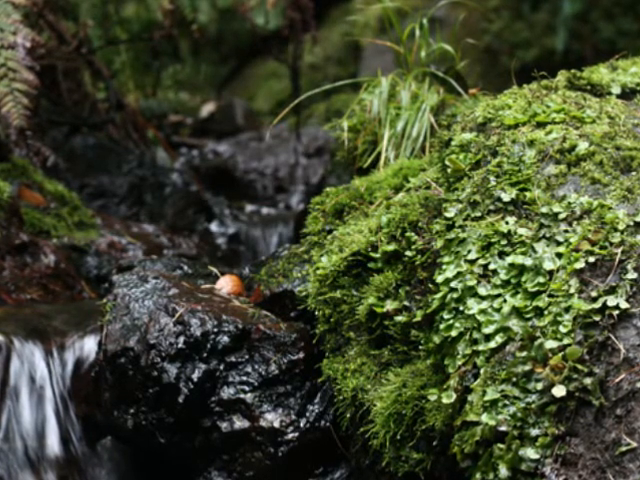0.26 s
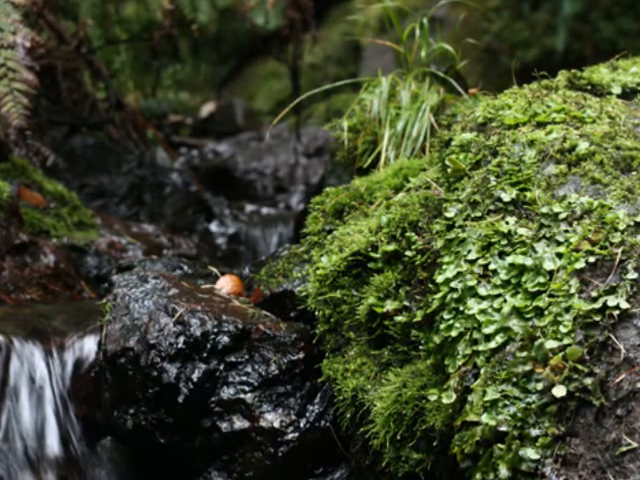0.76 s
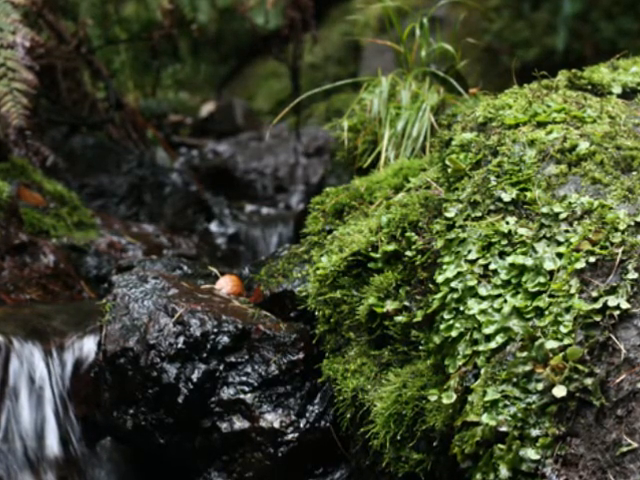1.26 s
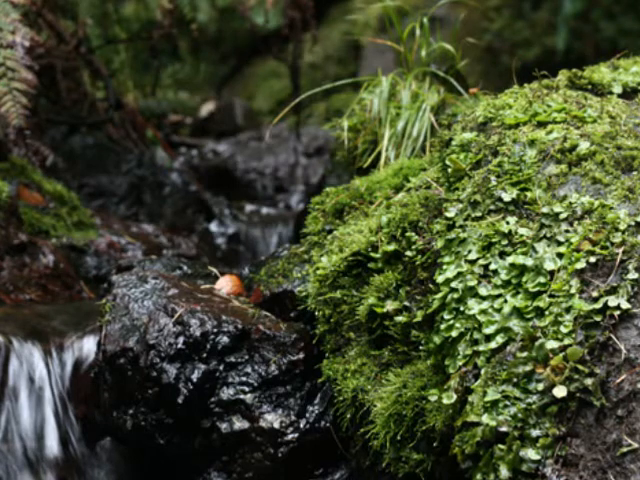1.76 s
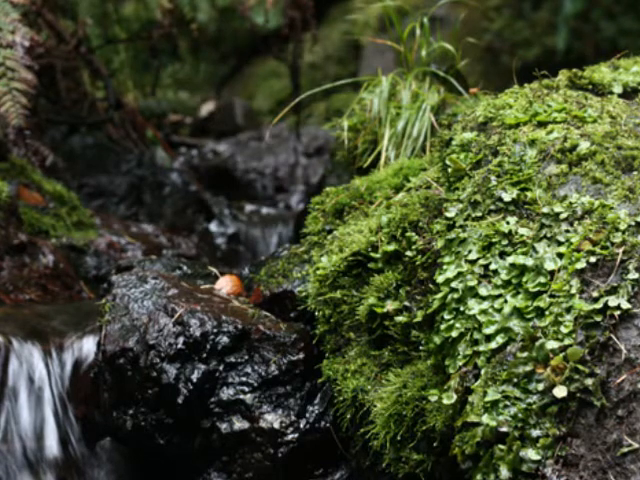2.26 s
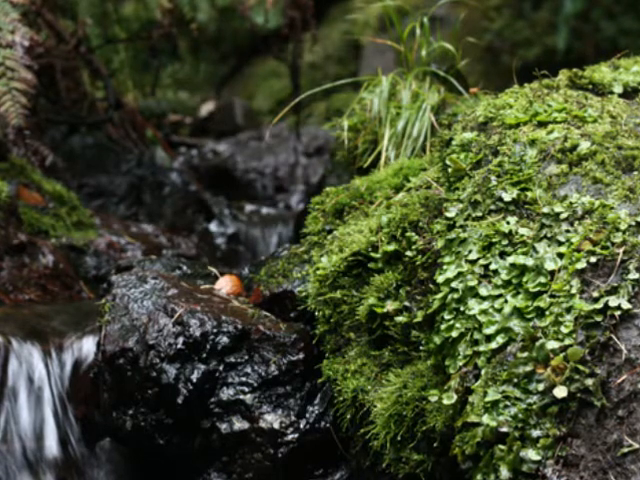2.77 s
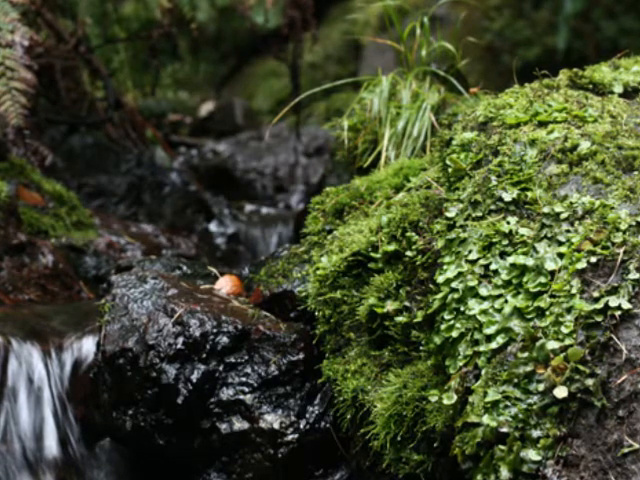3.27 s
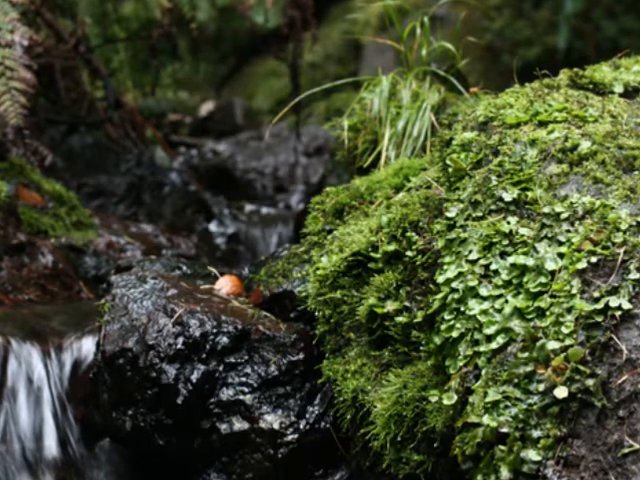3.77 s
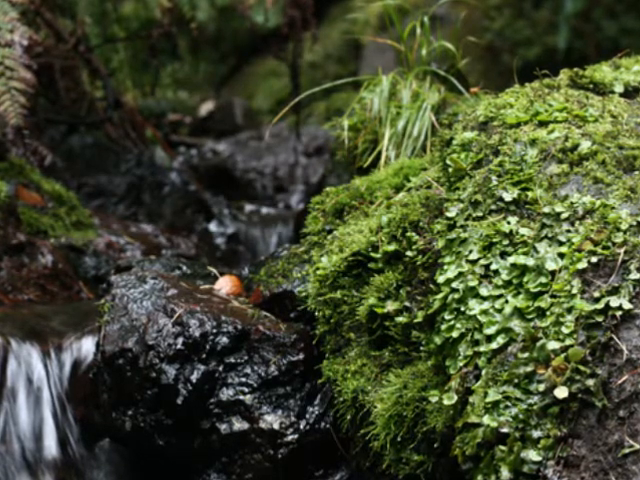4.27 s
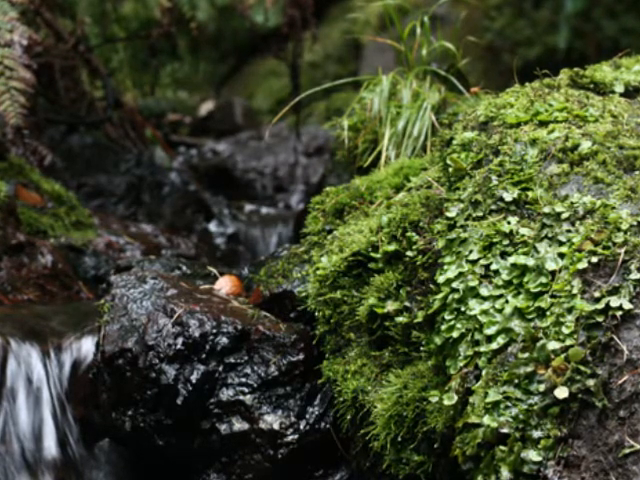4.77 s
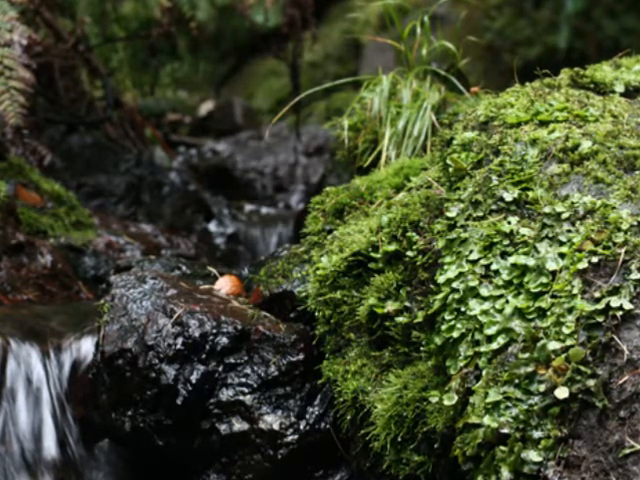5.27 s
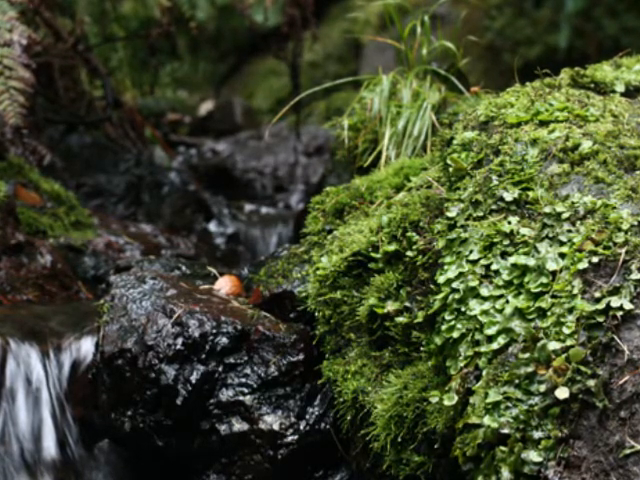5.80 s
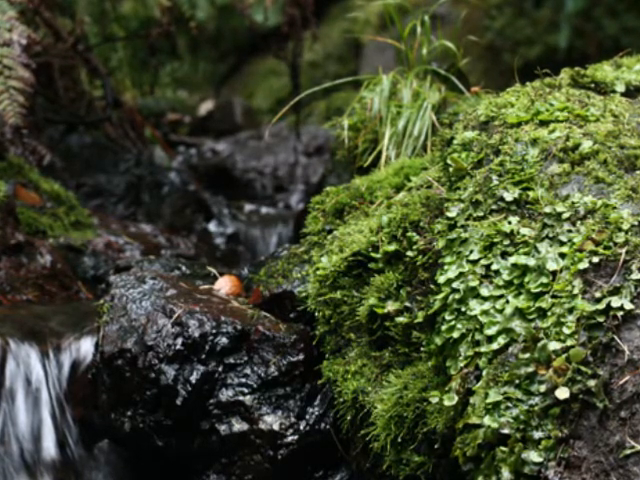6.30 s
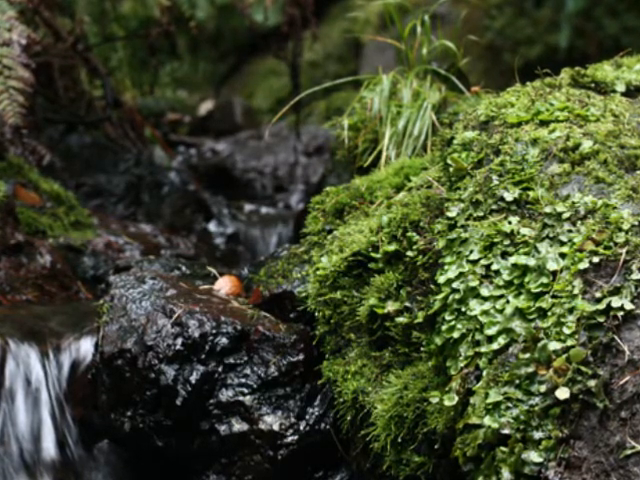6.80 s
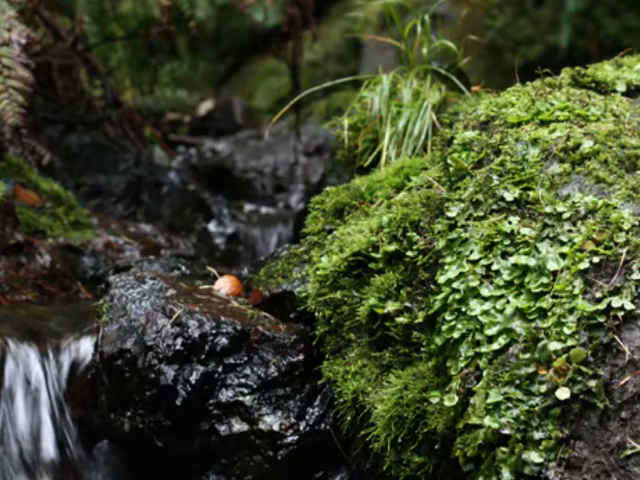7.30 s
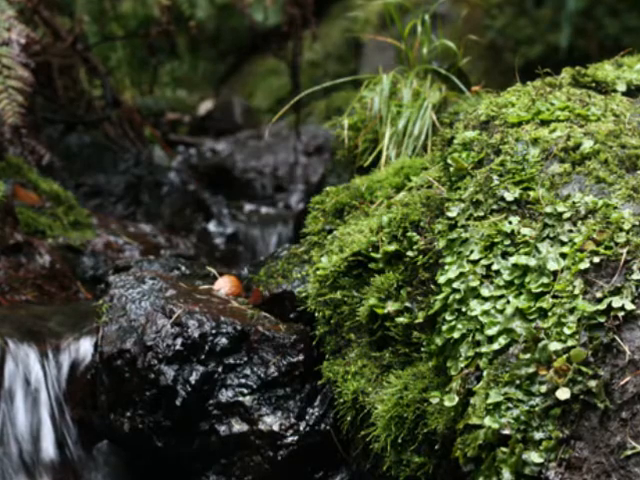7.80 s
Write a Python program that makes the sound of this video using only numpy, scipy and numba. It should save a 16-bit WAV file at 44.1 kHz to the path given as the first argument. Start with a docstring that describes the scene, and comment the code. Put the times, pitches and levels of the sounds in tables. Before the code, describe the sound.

A small stream splashes and bubbles over rocks, then fades within two seconds to a faint trickle with tiny drips.

```python
"""A small woodland stream. A near cascade on the left churns loudly and fades out in about two seconds,
leaving a slowly fading trickle of single bubbles and tiny splashes over a soft rush and a low rumble.
Bubbles ring as short sines that climb in pitch as they near the surface; drops strike as noise bursts.
Wet rocks close by give the single bubbles, the splashes and the near trickle a short tail."""
import sys
import numpy as np
from scipy import signal
from scipy.fft import rfft, irfft, next_fast_len
from scipy.io import wavfile
from scipy.ndimage import uniform_filter1d
from numba import njit

SR = 44100
rng = np.random.default_rng(int(sys.argv[2]) if len(sys.argv) > 2 else 0)


def wrap_up_sound(samples):
    """Save the sound to the file named by the first command line argument, as 16-bit audio."""
    columns = np.atleast_2d(samples).T
    # keep every value between -1 and 1, then stretch to whole-number steps
    tamed = np.clip(columns, -1, 1)
    steps = np.round(tamed * 32767).astype(np.int16)
    wavfile.write(sys.argv[1], SR, steps)


N = 355005

# Cascade bubbles and white water: freq_hz, density_db
CHURN_SPECTRUM = [(120, -90.5), (200, -31), (471, -2.5), (1170, -4.5), (1740, -3.5), (2850, -9.5),
                  (4500, -10), (9830, -22.5), (15500, -28)]
# Spray of tiny drops: freq_hz, density_db
SPRAY_SPECTRUM = [(1000, -16), (2500, -0.5), (6000, -5.5), (10000, -5.5), (15000, -22.5)]
# Cascade balance: freq_hz, left_minus_right_db
CASCADE_PAN = [(200, 2.5), (400, 9.5), (1300, 5.5), (4400, 2.5)]
# Trickle bubbles: freq_hz, density_db
PATTER_SPECTRUM = [(500, -6), (1000, 0), (1600, 1), (3500, -4.5), (7000, -16)]
# Far water: freq_hz, density_db
RUSH_SPECTRUM = [(70, -36.5), (120, -3), (470, -2.5), (700, -1.5), (1800, -9), (5000, -16.5), (9000, -24),
                 (15000, -27.5)]
# Low rumble: freq_hz, density_db
RUMBLE_SPECTRUM = [(12, -69), (20, -13), (53, 4.5), (200, -14), (260, -50), (440, -120)]
# Trickle balance: freq_hz, left_minus_right_db
TRICKLE_PAN = [(60, 3), (380, 0), (1300, 4), (4000, 2)]
# Decay among wet rocks: freq_hz, t60_s
ROCK_DECAY = [(500, 0.041), (8000, 0.056)]
# Single bubbles: start_s, level_db, pitch_hz
CLEAR_BUBBLES = [(0.045, -5, 1960), (0.049, -20.5, 597), (0.103, -3, 2150), (0.154, -1.5, 1710),
                 (0.19, -8.5, 1520), (0.293, -10.5, 1440), (0.335, -7.5, 1474), (0.34, -17, 756),
                 (0.499, -10, 2320), (0.64, -8, 2090), (0.659, -20, 587), (0.72, -3.5, 2270),
                 (0.739, -26.5, 430), (0.77, -11, 1440), (0.817, -16, 770), (0.83, -13, 783),
                 (1.038, -9.5, 2010), (1.231, -19, 812), (1.268, -18, 547), (1.59, -13, 2120),
                 (1.829, -24, 800), (2.173, -34.5, 1394), (2.423, -32, 2836), (2.589, -37.5, 2610),
                 (2.667, -28, 1750), (2.987, -33, 1250), (3.297, -42.5, 1054), (3.465, -36, 2160),
                 (3.519, -28.5, 4060), (3.614, -30.5, 3650), (3.671, -36.5, 1510), (3.723, -31, 1520),
                 (3.927, -35, 3240), (3.985, -37, 1810), (4.085, -38, 1820), (4.159, -34, 2440),
                 (4.23, -40, 1520), (4.282, -31.5, 3850), (4.319, -33.5, 1830), (4.407, -41, 1810),
                 (4.457, -35, 1770), (4.512, -37, 3140), (4.689, -29.5, 1540), (4.741, -35.5, 2130),
                 (4.894, -41.5, 1500), (5.017, -33.5, 3880), (5.04, -41, 1540), (5.114, -39.5, 990),
                 (5.145, -32, 1240), (5.159, -37, 2700), (5.205, -41.5, 1600), (5.387, -38.5, 3170),
                 (5.537, -45, 1080), (5.563, -42, 2010), (5.686, -37.5, 3870), (5.931, -38.5, 1077),
                 (6.103, -40, 2120), (6.135, -34.5, 1217), (6.168, -43.5, 1380), (6.437, -41, 2050),
                 (6.52, -47, 2110), (6.686, -51, 620), (6.704, -41, 1890), (6.75, -57, 620),
                 (6.791, -41.5, 1550), (7.043, -42, 2360), (7.19, -46, 2034), (7.299, -40, 1460),
                 (7.301, -38, 6100), (7.371, -39, 1530), (7.394, -40, 2880), (7.402, -44, 4300),
                 (7.576, -44, 2370), (7.575, -43, 1390), (7.625, -45, 1490), (7.725, -40.5, 5330),
                 (7.965, -36.5, 5700)]
# Single bubble and glug balance: pitch_hz, left_minus_right_db
BUBBLE_PAN = [(500, 28.5), (1200, 9), (1800, 6.5), (4000, 3.5)]
# Drop impacts: start_s, level_db, centre_hz
DROP_SPLASHES = [(0.0543, -16.5, 10370), (0.0685, -9.5, 3320), (0.105, -3, 4460), (0.1332, -13, 7600),
                 (0.2528, -13.5, 5170), (0.357, -9, 4330), (0.398, -13.5, 4260), (0.46, -12, 5900),
                 (0.501, -11.5, 4500), (0.648, -10.5, 4130), (0.7355, -9, 4760), (0.8938, -14, 4320),
                 (1.279, -17, 5870), (1.325, -12.5, 4100), (1.3735, -22, 9300), (1.4708, -23.5, 4340),
                 (1.587, -24, 5070), (1.6256, -21.5, 4960), (1.727, -27, 12100), (1.74, -21.5, 3000),
                 (1.851, -23.5, 3250), (2.146, -30, 4660), (2.2184, -40, 9050), (2.236, -36.5, 5000),
                 (2.5865, -43.5, 9200), (2.783, -35, 3880), (2.9958, -30.5, 4380), (3.086, -39.5, 10700),
                 (3.315, -36, 2880), (3.5813, -34.5, 7300), (3.592, -35, 7000), (3.9265, -47, 10500),
                 (3.9858, -48, 10000), (4.086, -39.5, 9100), (4.479, -40, 4860), (4.5151, -45, 8590),
                 (4.815, -40, 7600), (4.9786, -48, 8900), (5.724, -43.5, 9110), (5.7962, -47, 13600),
                 (6.4228, -47.5, 12300), (6.6023, -45.5, 4350), (6.747, -42, 3540), (6.7983, -42.5, 5380),
                 (6.9172, -49.5, 9100), (7.006, -47, 3420), (7.294, -42.5, 5110), (7.392, -42, 3500),
                 (7.426, -45, 4230), (7.7062, -42, 5250)]
# Rising bubbles: start_s, level_db, start_hz, life_s, rise_share
GLUGS = [(0.098, -27, 405.5, 0.041, 0.65), (0.131, -25, 447, 0.032, 0.54), (0.59, -32, 429.7, 0.073, 0.65),
         (0.66, -40.5, 277.5, 0.08, 0.6), (0.762, -29, 388, 0.05, 0.1), (0.995, -33, 379, 0.055, 0.49),
         (1.048, -30, 419, 0.04, 1.2), (2.489, -39.5, 890, 0.034, 1.2)]

CASCADE_END_S, TRICKLE_END_S = 2.124, 10.27  # fades reach zero
SIDES = np.array([[.5], [-.5]])  # share of pan_db: left, right


def amp(db):
    """dB to gain."""
    return 10 ** (np.asarray(db) / 20)


def unit(x):
    """x at rms 1."""
    return x / np.sqrt(np.mean(x ** 2) + 1e-20)


def along(table, hz):
    """Table value at hz, on a log axis."""
    freq_hz, values = np.transpose(table)
    return np.interp(np.log(hz + 1), np.log(freq_hz + 1), values)


def filtered(x, response):
    """x through the gain curve response(hz)."""
    size = next_fast_len(N + 8192)
    return irfft(rfft(x, size) * response(np.fft.rfftfreq(size, 1 / SR)), size)[..., :N]


def panned(x, pan):
    """Stereo x tilted left per frequency."""
    return filtered(x, lambda hz: amp(along(pan, hz) * SIDES))


def fade(end_s):
    """Linear gain, 1 to 0."""
    return np.clip(1 - np.arange(N) / SR / end_s, 0, 1)


def drop_times(count):
    """Falling drops: uneven, never long apart."""
    return (np.arange(count) + 5 * rng.random(size=count)) * N / SR / (count + 5)


def flurry_times(drops_s, count, lag_s):
    """Bubbles follow the drops in flurries."""
    pick, wait = rng.random((count, 2)).T
    parent_s = drops_s[(pick ** 1.15 * len(drops_s)).astype(int)]
    return (parent_s - lag_s * np.log(1 - wait)) % (N / SR)


@njit
def ring(out, start, hz, cycles, gains, rise, attack_s, sag):
    """Adds sines that swell, sag and die; pitch climbs as each bubble nears the surface."""
    for k in range(len(start)):
        for i in range(min(int(cycles[k] * SR / hz[k]), out.shape[1] - start[k])):
            turns = i * hz[k] / SR
            age = turns / cycles[k]
            onset = 1 - np.exp(-(i / SR / (attack_s + 1 / hz[k])) ** 2)
            decay = np.exp(-sag * age - 8 * age ** 3)
            tone = np.sin(2 * np.pi * turns * (1 + rise[k] * age / 2)) * onset * decay
            out[0, start[k] + i] += gains[0, k] * tone
            out[1, start[k] + i] += gains[1, k] * tone


def bubbles(start_s, level_db, hz, cycles, pan_db, rise, attack_s, sag):
    """Ringing bubbles placed in stereo."""
    out = np.zeros((2, N))
    gains = amp(level_db + pan_db * SIDES)
    ring(out, (start_s * SR).astype(int), hz, np.clip(cycles, 1, 120), gains, rise, attack_s, sag)
    return out


def swarm(start_s, spectrum, cycles, spread_db, rise, width_db):
    """Random bubbles of all sizes; a few stand well above the rest."""
    pitch, rank, life, side, climb = rng.random((len(start_s), 5)).T
    low_hz, high_hz = spectrum[0][0], spectrum[-1][0]
    hz = low_hz * (high_hz / low_hz) ** pitch
    tilt_db = 18 * np.log10(hz / low_hz)  # offsets small bubbles being rarer per Hz and shorter
    level_db = along(spectrum, hz) + tilt_db - spread_db * np.log(rank + 0.087)
    life_cycles = cycles * np.exp(1.89 * (life - .5))
    pan_db = width_db * (2 * side - 1)
    rises = rise * climb ** 2 * np.sqrt(1000 / hz)
    return unit(bubbles(start_s, level_db, hz, life_cycles, pan_db, rises, attack_s=0.00022, sag=3.0))


def rush(spectrum, correlation, patch_db, patch_bands=6):
    """Rushing water: stereo noise with patches of random gain, rms 1."""
    cells = signal.stft(rng.standard_normal((2, N)), nperseg=256)[2]
    patches = uniform_filter1d(rng.standard_normal(cells.shape[1:]), size=patch_bands, axis=0)
    patches = uniform_filter1d(patches, size=6, axis=1)
    mid, side = signal.istft(cells * amp(patch_db * unit(patches)), nperseg=256)[1][:, :N]
    angle = np.arccos(np.clip(correlation, -1, 1)) / 2
    pair = np.cos(angle) * mid + np.sin(angle) * side * np.array([[1], [-1]])
    return unit(filtered(pair, lambda hz: amp(along(spectrum, hz))))


def spray(drops_s, attack_s, spread_db):
    """One soft burst of bright hiss per tiny drop."""
    kicks = np.zeros(N)
    kicks[(drops_s * SR).astype(int)] = amp(-spread_db * np.log(np.linspace(0, 1, len(drops_s)) + 0.05))
    age = np.arange(SR // 8) / SR / attack_s
    bursts = signal.fftconvolve(kicks, age ** 2 * np.exp(-age))[:N]
    return unit(bursts * rush(SPRAY_SPECTRUM, correlation=0.11, patch_db=4.5, patch_bands=20))


def roughen(x, depth, corner_hz):
    """Broken surface: fast random level changes smear tones into splash, treble only."""
    shake = unit(filtered(rng.standard_normal(N), lambda hz: 1 / (1 + (hz / corner_hz) ** 2)))
    return x + depth * filtered(x * shake, lambda hz: 1 / (1 + (corner_hz / (hz + 1)) ** 4))


def cascade():
    """Dense bubble flurries over white water, spattering where it lands."""
    drops_s = rng.permutation(drop_times(count=500))
    starts_s = flurry_times(drops_s, count=9000, lag_s=.018)
    churn = swarm(starts_s, CHURN_SPECTRUM, cycles=19.8, spread_db=3.0, rise=0.49, width_db=24.0)
    white_water = rush(CHURN_SPECTRUM, correlation=0.49, patch_db=3.0)
    spatter = spray(drops_s, attack_s=0.0017, spread_db=6.0)
    water = roughen(churn, depth=0.49, corner_hz=1310) + amp(1.0) * white_water + amp(-11.5) * spatter
    prefade_db = -20.5 - 2.5 * np.exp(-np.arange(N) / SR / 0.7)
    return amp(prefade_db) * fade(CASCADE_END_S) * panned(water, CASCADE_PAN)


def trickle():
    """Tiny drops throw spray and small bubbles over even far water and a low rumble."""
    t = np.arange(N) / SR
    drops_s = rng.permutation(drop_times(count=420))
    starts_s = flurry_times(drops_s, count=3600, lag_s=.014)
    patter = swarm(starts_s, PATTER_SPECTRUM, cycles=27.6, spread_db=3.5, rise=0.35, width_db=6)
    near = roughen(patter, depth=0.39, corner_hz=1200)
    near += amp(-8.0) * spray(drops_s, attack_s=.0025, spread_db=6)
    far = rush(RUSH_SPECTRUM, correlation=0.36, patch_db=1.3)
    rumble = rush(RUMBLE_SPECTRUM, correlation=0.62, patch_db=-0.5)
    water = amp(-52 + 0.21 * t) * (near + amp(-6.0) * rocks(near))
    water += amp(-43.5 - 1.1069 * t) * far
    water += amp(-57.5 + 0.1 * t) * rumble
    return fade(TRICKLE_END_S) * panned(water, TRICKLE_PAN)


def rocks(x):
    """Short scattered reflections off wet stones, separate per ear."""
    hz, t, cells = signal.stft(rng.standard_normal((2, SR // 4)), SR, nperseg=128)
    tail = signal.istft(cells * amp(-60 * t / along(ROCK_DECAY, hz)[:, None]), SR, nperseg=128)[1]
    delayed = np.pad(x, ((0, 0), (130, 0)))
    return signal.fftconvolve(delayed, tail / np.linalg.norm(tail[0]), axes=1)[:, :N]


def clear_bubbles():
    """Single bubbles, each trailed by three weaker, smaller ones; the larger form further left."""
    start_s, level_db, hz = np.transpose(CLEAR_BUBBLES)
    lag, loss, pitch = rng.random((len(start_s), 3, 3)).transpose(2, 0, 1)
    start_s = np.append(start_s, start_s[:, None] + 0.03 * lag ** 2)
    level_db = np.append(level_db, level_db[:, None] - 9.5 - 10 * loss)
    hz = np.append(hz, hz[:, None] * 2.2 ** pitch)
    calm_stretch = np.where(start_s > CASCADE_END_S, 1.73, 1)  # longer ring once the churn is gone
    cycles = 21 * (hz / 1000) ** 0.077 * calm_stretch
    rise = 0.15 * (hz / 1000) ** -1.3  # large bubbles climb further
    pan_db = along(BUBBLE_PAN, hz)
    return bubbles(start_s - .5 / hz, level_db, hz, cycles, pan_db, rise, attack_s=0.00083, sag=3.4)


def splashes(attack_s=0.001, t60_s=0.018):
    """Drops strike the surface: short bursts of bright band noise."""
    out, t = np.zeros((2, N + 4096)), np.arange(4096) / SR
    hz = np.fft.rfftfreq(len(t), 1 / SR)
    for start_s, level_db, centre_hz in DROP_SPLASHES:
        noise = rng.standard_normal(len(t)) + 0.98 * rng.standard_normal((2, len(t)))
        octaves = np.log2((hz + 1) / centre_hz)
        band = np.exp(-(octaves / 0.32) ** 2) + 0.92 / (1 + octaves ** 2) ** 2
        envelope = amp(level_db - 60 * t / t60_s) * (1 - np.exp(-(t / attack_s) ** 2))
        out[:, round(start_s * SR):][:, :len(t)] += envelope * unit(irfft(rfft(noise) * band))
    return out[:, :N] * amp(3 * SIDES)


def glugs(sag_db=10.5):
    """Long-lived bubbles sweep up as they break the surface: low glugs, one higher blip."""
    out = np.zeros((2, N))
    for start_s, level_db, start_hz, life_s, rise in GLUGS:
        age = np.arange(int(life_s * SR)) / (life_s * SR)
        envelope = amp(level_db - sag_db * age) * np.clip(6 * np.minimum(age, 1 - age), 0, 1)
        hz = start_hz * (1 + rise * age ** 1.6)
        tone = envelope * np.sin(2 * np.pi * np.cumsum(hz) / SR)
        out[:, round(start_s * SR):][:, :len(age)] += amp(along(BUBBLE_PAN, start_hz) * SIDES) * tone
    return out


def high_hiss(peak_s=2.98, width_s=0.36):
    """Faint hiss near 10 kHz; swells once and goes."""
    swell = np.exp(-((np.arange(N) / SR - peak_s) / width_s) ** 2)
    return amp(-61) * swell * rush([(5000, -16), (9600, 0), (14500, -18)], correlation=.3, patch_db=4)


def scene():
    """Single events ring among the rocks, over cascade, trickle and hiss."""
    events = roughen(clear_bubbles() + glugs(), depth=0.33, corner_hz=1600) + splashes()
    return events + amp(-3.5) * rocks(events) + cascade() + trickle() + high_hiss()


def record(dry):
    """Microphone treble roll-off, then a hard band limit."""
    rolloff_hz, limit_hz = 15000, 15850
    return filtered(dry, lambda hz: (hz < limit_hz) / (1 + (hz / rolloff_hz) ** 12))


dry = scene()
out = record(dry)
wrap_up_sound(out)
```